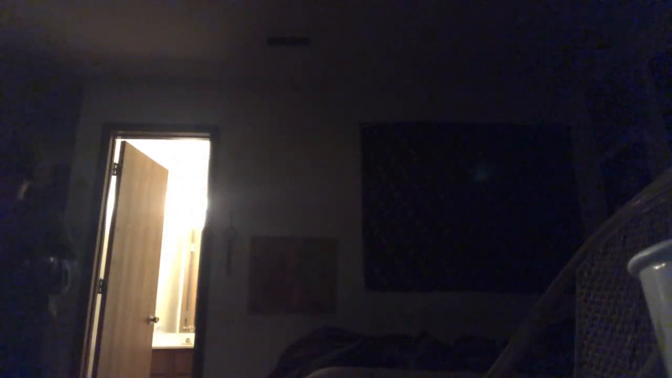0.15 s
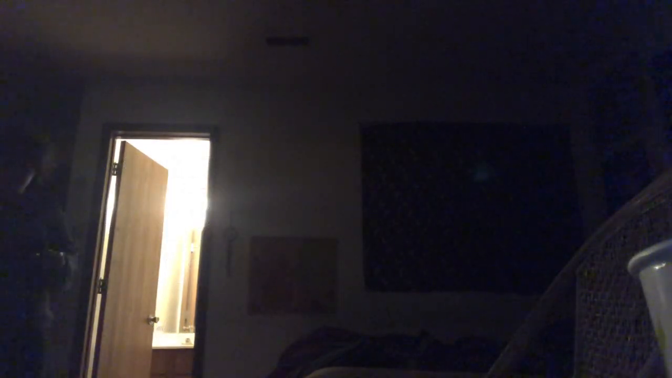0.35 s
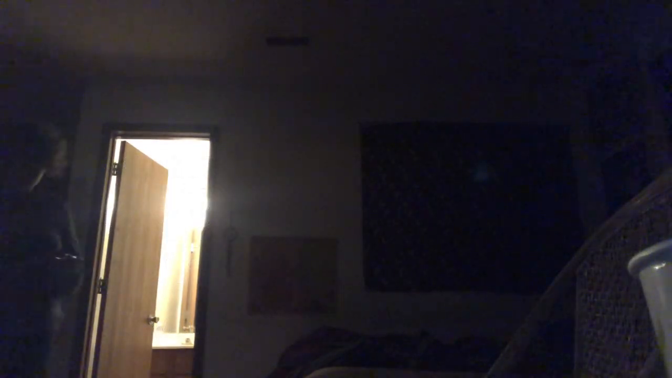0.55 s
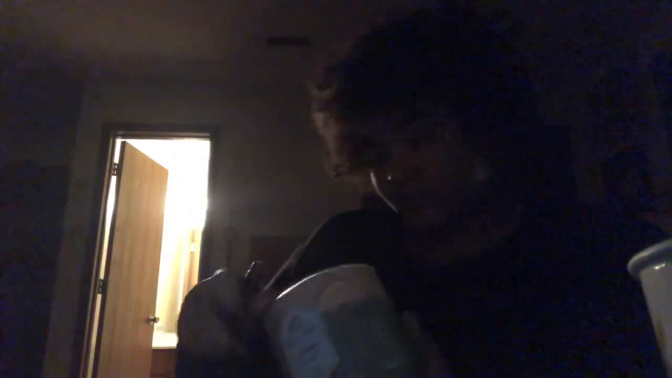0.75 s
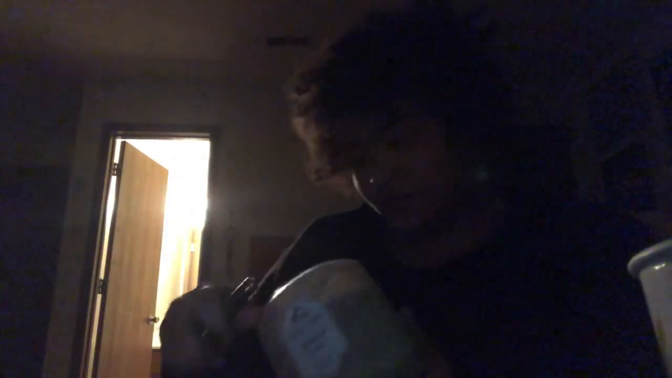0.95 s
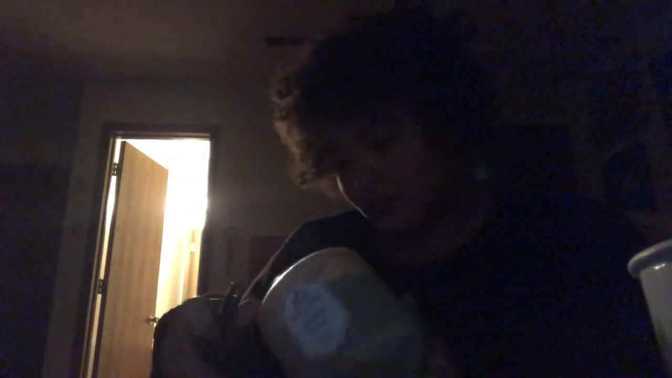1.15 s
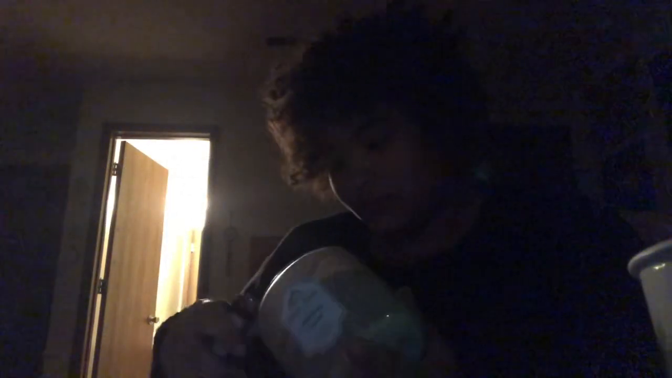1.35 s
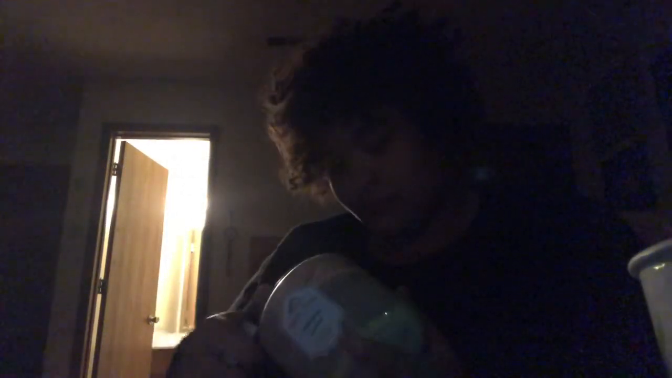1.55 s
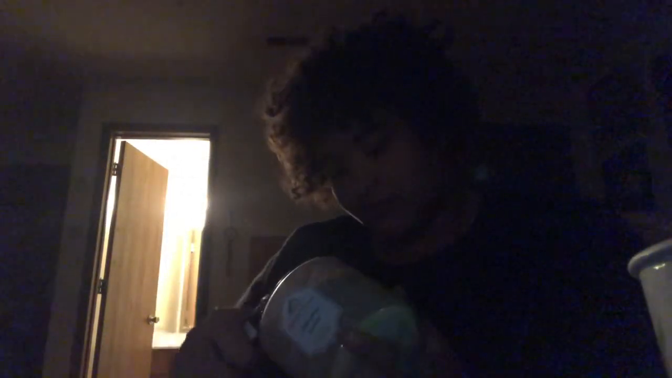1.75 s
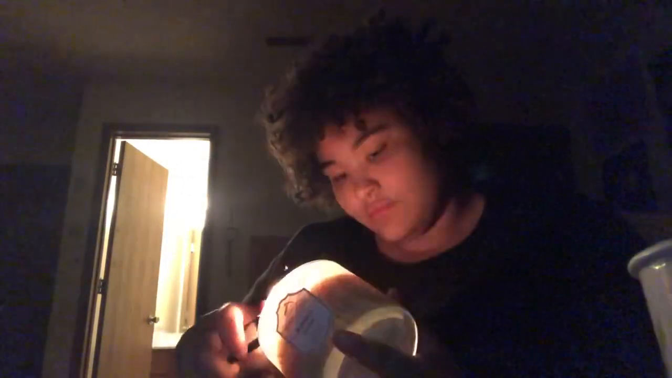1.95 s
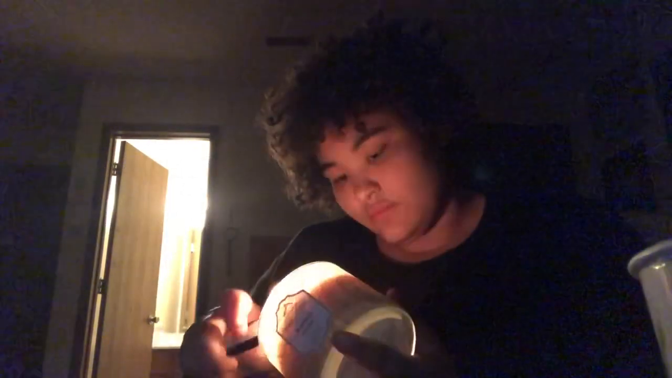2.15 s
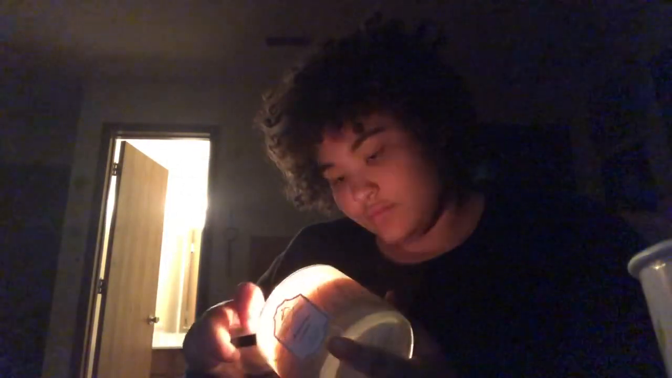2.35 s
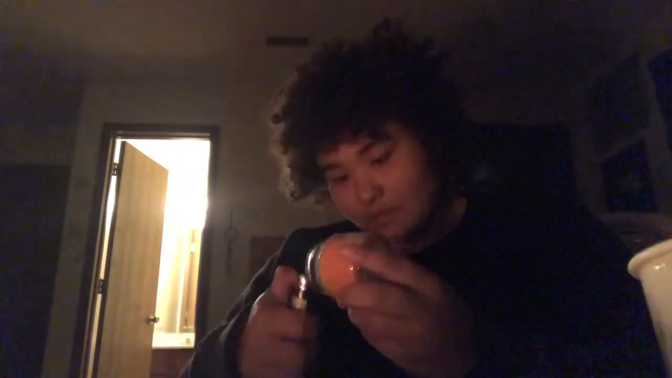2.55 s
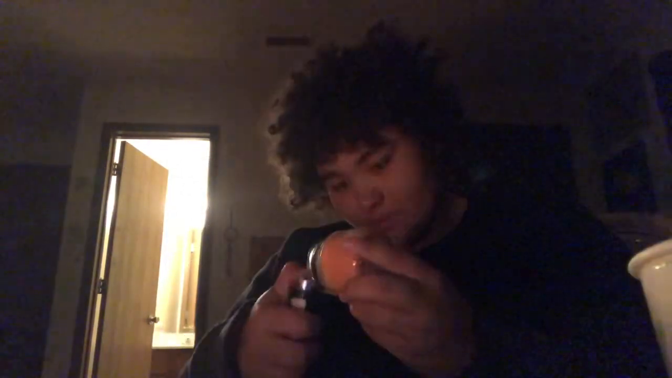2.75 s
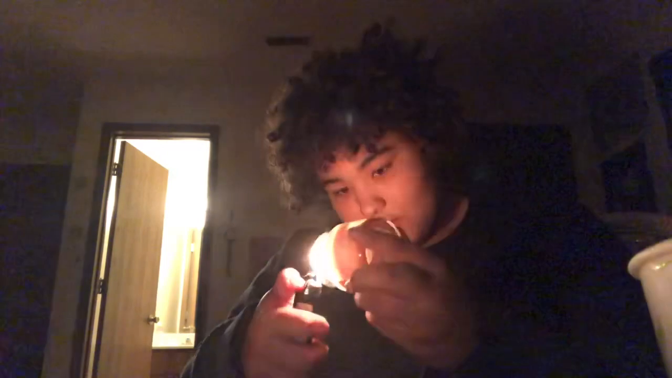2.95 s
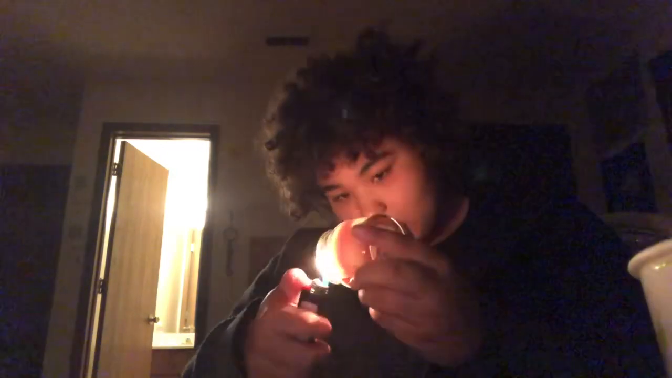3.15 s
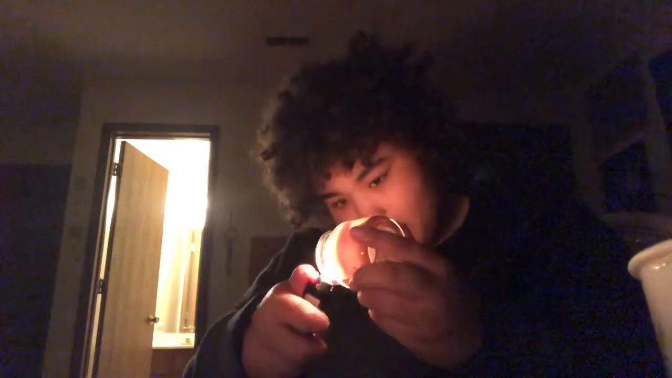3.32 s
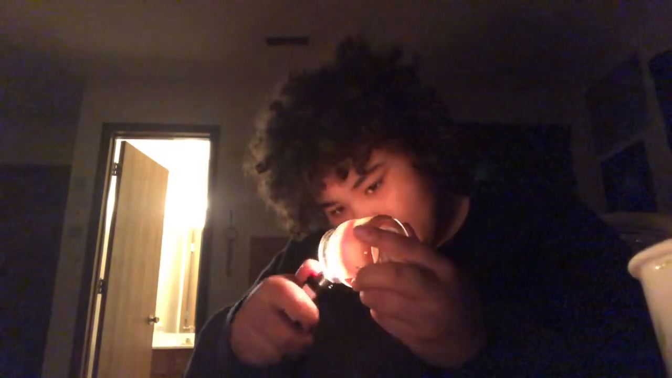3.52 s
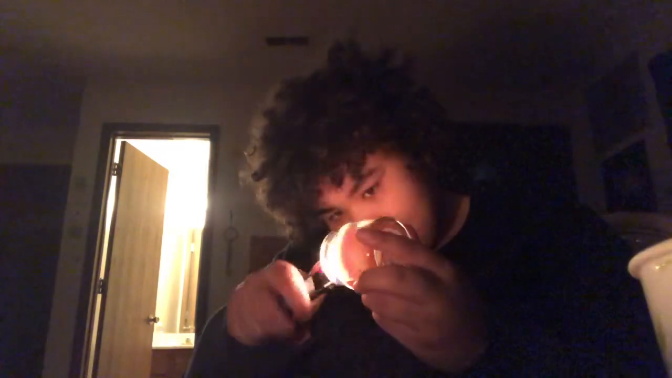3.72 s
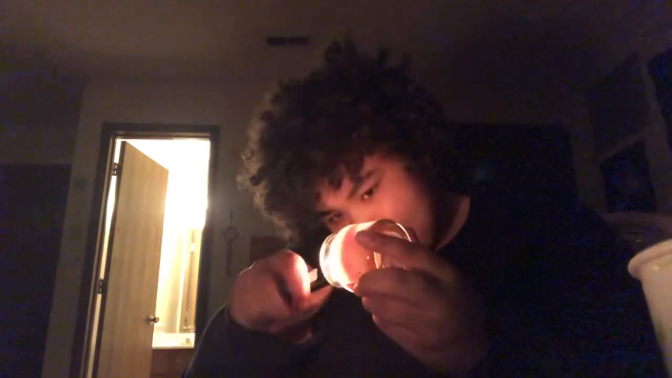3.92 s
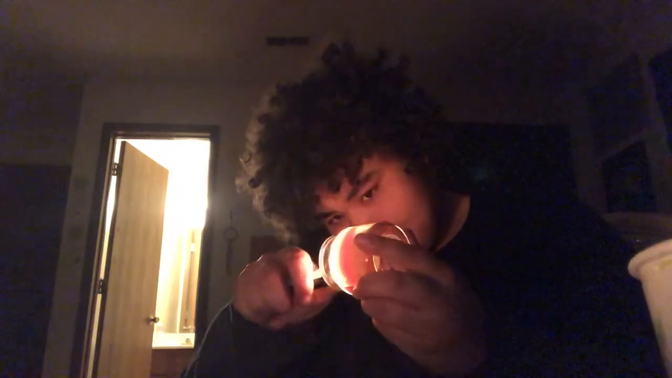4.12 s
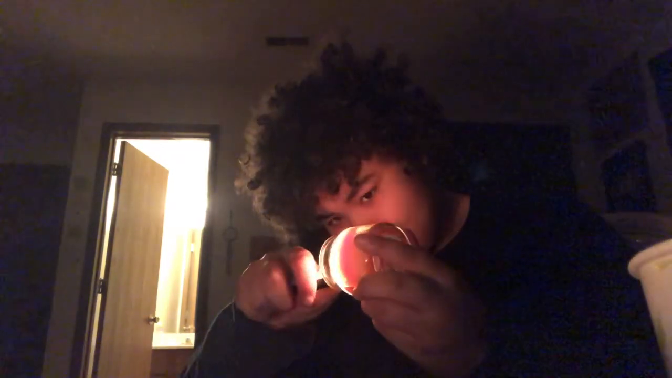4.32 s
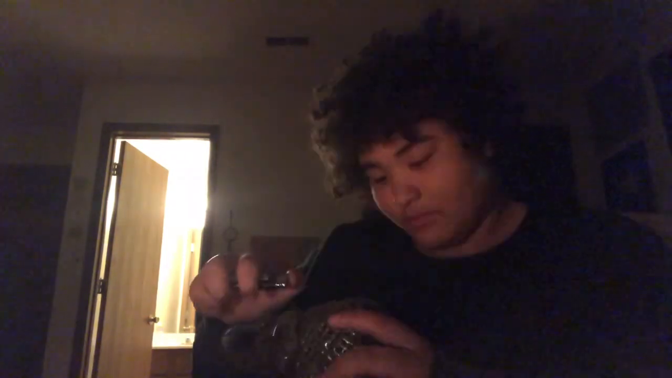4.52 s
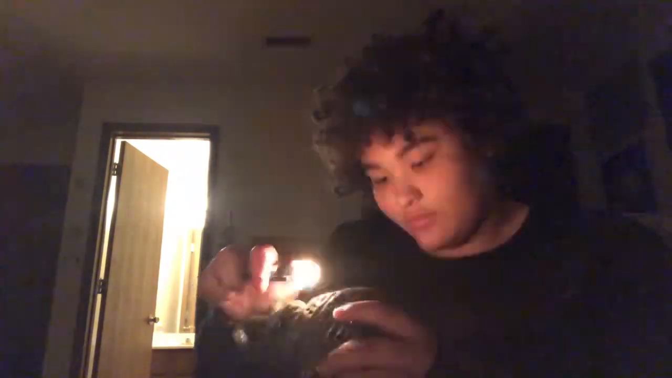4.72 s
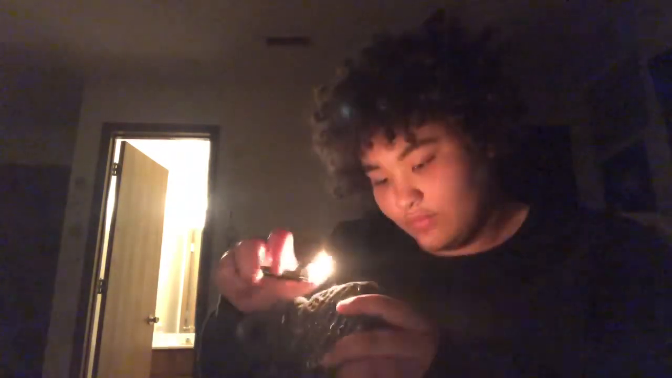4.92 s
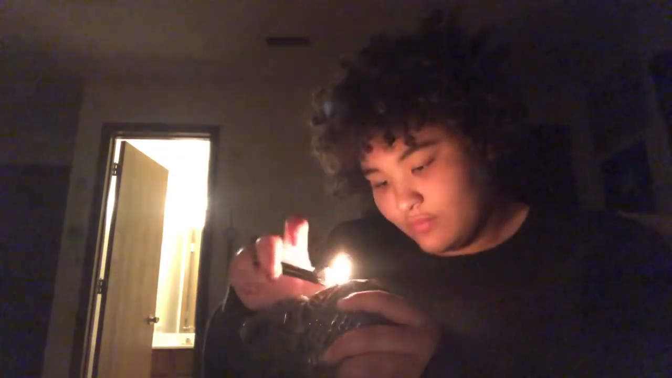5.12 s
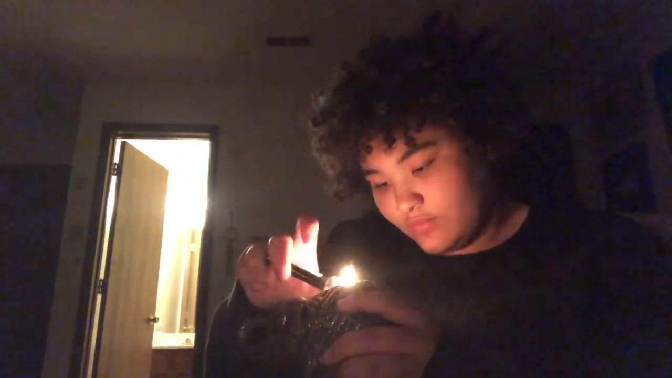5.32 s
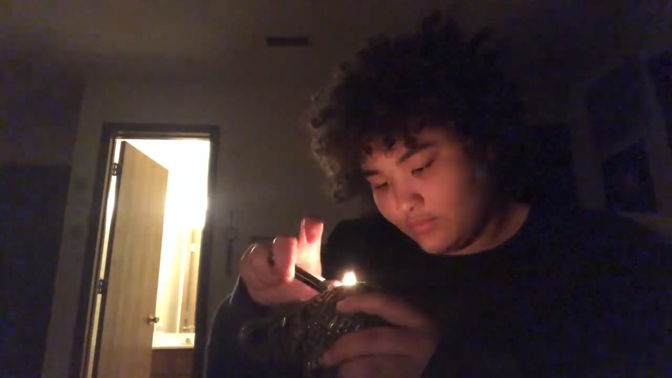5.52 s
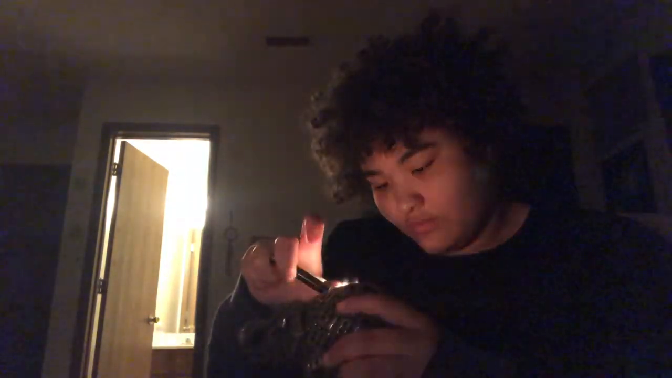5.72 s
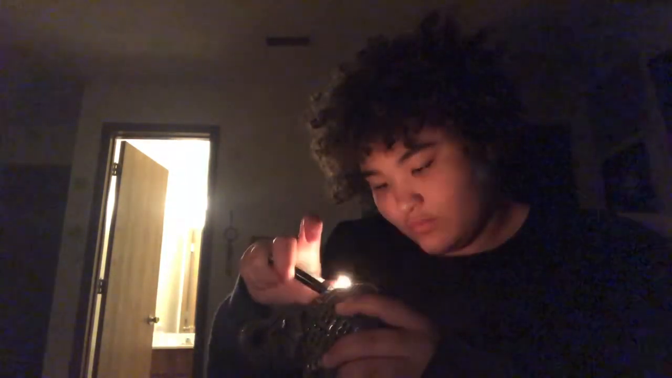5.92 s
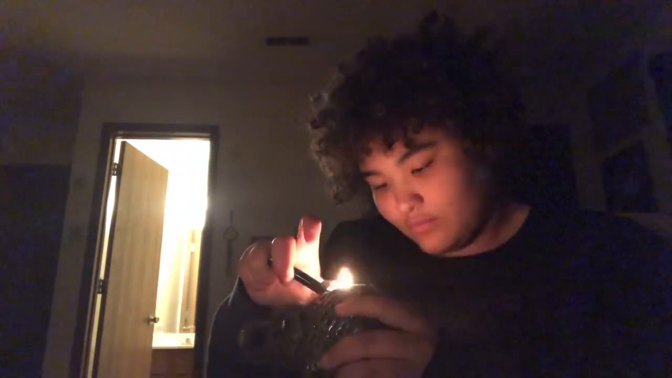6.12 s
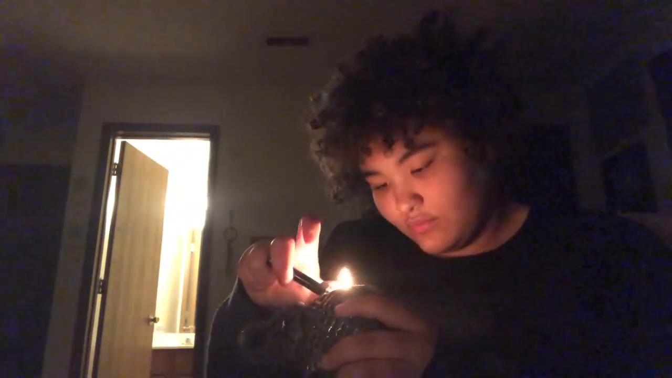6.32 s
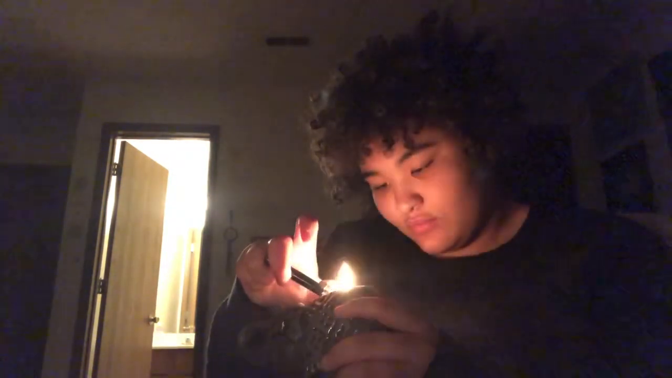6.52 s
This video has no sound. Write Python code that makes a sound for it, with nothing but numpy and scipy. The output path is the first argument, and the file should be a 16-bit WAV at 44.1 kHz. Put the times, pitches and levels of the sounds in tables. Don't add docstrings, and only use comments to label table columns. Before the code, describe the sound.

A quiet, small bedroom heard close up, with low house rumble, a distant airy drone that swells and sinks, and faint microphone hiss. From 0 to 0.7 s clothing swishes, rubs and creaks dully, strongest near 0.3 and 0.6. A brief dip at 0.8 joins another take; weak fabric sounds follow at 1.2-1.7, with a tiny tick at 1.75. At 1.87 a flint wheel rasps upward into a loud, bright snap at 1.92, with a soft thumb thump, short room tail and gas rush. At 2.25 a quick triple tap rings a glass jar, choked at 2.34. After a dip at 2.6, small ticks lead to a shorter strike at 2.95. Lever clicks come near 3.4. After another dip at 4.5, the loudest grind and snap land at 4.69, then ticks at 4.87 and 5.38. Only hiss and gently swelling rumble remain until about 6.7.

```python
import sys
import numpy as np
from scipy import signal
from scipy.fft import rfft, irfft
from scipy.io import wavfile

SR = 44100
rng = np.random.default_rng(int(sys.argv[2]) if len(sys.argv) > 2 else 0)


def linear_from_db(decibels):
    return 10 ** (np.asarray(decibels, float) / 20)


def master(y):
    cut = np.clip(np.atleast_2d(y).T, -1, 1)
    pcm = np.round(cut * 32767)
    wavfile.write(sys.argv[1], SR, pcm.astype(np.int16))


N = 294147
TIME = np.arange(N) / SR

# (start [s], hiss top tilt [dB], hiss level [dB], hiss drift [dB/s], rumble level [dB])
TAKES = [
    (0, -4, -79, -0.5, -75),
    (0.804, -1, -76.5, -0.9, -77.5),
    (2.601, -2, -78.5, -0.75, -76),
    (4.505, 0.1, -77.5, 0, -74),
]
# (frequency [Hz], density [dB/Hz])
HOUSE_SPECTRUM = [(15, -46), (25, -15), (81, 2), (108, -5.5), (130, -6), (271, -12), (295, -13),
                  (406, -24.5), (545, -33), (700, -35), (910, -53.5), (1540, -120)]
# (peak [s], level [dB], 20 dB rise [s], 20 dB fall [s])
RUMBLE_SWELLS = [(1.6, -69.5, 2.5, 1.1), (2.1, -73.5, .8, 0.77), (4.85, -72.5, .8, .8),
                 (5.96, -72, 1.7, 1.0), (6.67, -71, 1.0, 1.0)]
# (peak [s], level [dB], 20 dB rise [s], 20 dB fall [s])
DRONE_SWELLS = [(.78, -81, .6, .6), (1.35, -68.5, 2.2, 1), (2.13, -68.5, 0.94, 1.34),
                (3.699, -66.5, 0.55, 0.86), (4.801, -70.5, 1.42, .8)]
# (frequency [Hz], density [dB/Hz])
HISS_SPECTRUM = [(350, -28.5), (600, 1.5), (975, -1.5), (1250, -1), (1340, -3), (2060, -8), (2340, -8),
                 (4240, -12.5), (5010, -5.5), (6340, -14.5), (15200, -17.5), (15800, -13), (16500, -34)]
# (peak [s], level [dB], 20 dB rise [s], 20 dB fall [s], bright top over body [dB])
CLOTH_STROKES = [
    (.02, -70.5, 0.12, 0.2, -3),
    (.272, -61, 0.15, 0.14, -5.5),
    (.35, -76, 0.089, 0.13, 8),
    (.59, -69, .04, 0.098, -24),
    (.67, -73, 0.065, .3, -8),
    (1.38, -77, .1, 0.19, 5),
    (1.59, -81, 0.098, .06, 13),
    (1.7, -92, .1, .1, -3),
]
# (peak [s], level [dB], 20 dB rise [s], 20 dB fall [s], pitch [Hz])
CLOTH_CREAKS = [
    (.03, -68.5, 0.18, .35, 1400),
    (.22, -70, 0.036, .2, 1400),
    (.28, -63, 0.052, .06, 290),
    (.58, -60, 0.026, 0.17, 1330),
    (.59, -63, 0.061, .05, 265),
    (.685, -63, .05, .06, 273),
    (1.22, -72.5, 0.084, .3, 1300),
    (2.692, -67.5, 0.046, .03, 3400),
    (4.31, -78, .06, .6, 1950),
    (4.45, -82, 0.19, .15, 1952),
]
# (time [s], peak level [dB], part, crack over ring [dB], crack centre [Hz])
TICKS = [(1.75, -57, "guard", -1, 7000), (2.659, -55, "guard", 10.5, 6400),
         (2.6598, -49.5, "hood", 0, 11000), (2.8927, -49, "tank", 9, 4080), (2.8905, -57, "hood", -2, 8000),
         (3.378, -41, "lever", 8.5, 5800), (3.378, -59, "spring", 14, 14500), (3.38, -54, "case", 1, 7000),
         (3.472, -60, "lever", 0, 7000), (3.4745, -58, "lever", -9, 14000), (3.477, -54, "case", 2, 5050),
         (4.653, -55, "case", 3.5, 5020), (4.873, -61, "hood", -1.5, 10000),
         (4.879, -58, "guard", 7.5, 3610), (5.3737, -54, "spring", -4.5, 3400),
         (5.3738, -57.5, "nozzle", 5, 6000), (5.3825, -56, "spring", -2, 3400),
         (5.392, -57, "spring", -6, 3430)]
LIGHTER_PARTS = {"lever": (4550, 130), "guard": (4500, 500), "spring": (2300, 110), "case": (3200, 600),
                 "tank": (1350, 350), "hood": (13000, 3000), "nozzle": (3370, 200)}
# (wheel starts [s], snap [s], grind at start [dB], grind at end [dB], snap level [dB])
STRIKES = [
    (1.874, 1.9217, -68, -34, -18),
    (2.924, 2.9514, -60, -39.5, -17.5),
    (4.653, 4.689, -68, -30, -16),
]
# (frequency [Hz], width [Hz], level in strikes 1, 2, 3 [dB])
WHEEL_MODES = [(4600, 1100, -3.5, 3, -2.5), (11730, 954, 2.5, -12, 3), (8000, 4470, -6, -8, -8),
               (13520, 2800, -10.5, -5.5, -6)]
# (frequency [Hz], width [Hz], level in strikes 1, 2, 3 as grip changes [dB])
SNAP_MODES = [(1300, 60, -16.5, -15.5, -25), (2500, 340, -12.5, -13, -25), (3717, 1200, -2.5, -2, -7),
              (4650, 630, 1, 5.5, -0.5), (5900, 700, -2.5, -4, 2), (7150, 600, -3.5, -3.5, 3),
              (8640, 900, -8.5, -6, 4.5), (10300, 460, -8, 3.5, 1.5), (10940, 800, 4, 4.5, 0),
              (13140, 710, -1.5, 0.5, -5.5), (14570, 1000, 0, -2.5, -3), (16500, 990, -6, -11.5, -12.5)]
# (frequency [Hz], width [Hz], level [dB])
GRIP_MODES = [(100, 32, -0.5), (194, 110, -1), (329.2, 77, 3.5), (578, 210, 2), (1050, 340, 1)]
# (frequency [Hz], density [dB/Hz])
SNAP_SPREAD = [
    [(88, -37.5), (150, -11.5), (354, -1), (612, -15.5), (1420, -13.5), (1560, -25.5), (2450, -14),
     (5250, -8.5), (8900, -11.5), (14200, -4.5), (16000, -18.5)],
    [(88, -43.5), (150, -17), (315, -8.5), (759, -25.5), (923, -25.5), (1260, -16), (2920, -17),
     (4410, -1.5), (6390, -11.5), (8730, -5.5), (16000, -18.5)],
    [(88, -30), (150, -2.5), (406, -13), (888, -20), (1450, -14.5), (1900, -20.5), (3290, -14), (3620, -16),
     (4490, -7.5), (14800, -10), (16000, -16.5)],
]
# (time [s], level [dB])
JAR_TAPS = [
    (2.2475, -39),
    (2.2497, -36.5),
    (2.2565, -44),
]
# (frequency [Hz], level [dB], t60 [s])
JAR_MODES = [(910, -25, 0.018), (1003, -2.5, 0.051), (1015, -8.5, 0.07), (1134, -11, 0.23),
             (1247, -10, 0.11), (1324, 1.5, 0.02), (1993, -14.5, 0.38), (2013, -9, 0.17), (3430, -25, 0.27),
             (3280, -14, 0.053), (5040, -22.5, 0.2), (5090, -29, 0.23), (8000, -13, 0.015),
             (13000, -13, 0.011)]
# (frequency [Hz], t60 [s])
ROOM_T60 = [(150, .25), (500, 0.31), (1500, 0.27), (3200, 0.3), (5200, 0.27), (8000, 0.21), (11000, 0.18),
            (15000, 0.11)]
# (delay [s], level [dB])
NEAR_ECHOES = [(.0045, -24), (.0085, -20.5), (.014, -24), (.021, -23)]


def rms_one(x):
    return x / np.sqrt(np.mean(x ** 2) + 1e-20)


def at_hz(points, hz):
    table = np.array(points)
    return np.interp(np.log(hz), np.log(table[:, 0]), table[:, 1])


def band(x, low_hz, high_hz):
    edges = [low_hz, min(high_hz, .47 * SR)]
    return signal.sosfilt(signal.butter(2, edges, "band", fs=SR, output="sos"), x)


def peak(x, hz, width_hz):
    r = np.exp(-np.pi * width_hz / SR)
    feedback = [1, -2 * r * np.cos(2 * np.pi * hz / SR), r * r]
    return signal.lfilter(np.array([1, 0, -1]) * (1 - r * r) / 2, feedback, x)


def drift(rate_hz):
    knots = rng.standard_normal(400)
    return np.interp(TIME * rate_hz, np.arange(len(knots)), knots)


def coloured(spectrum, patchy_db):
    hz = np.maximum(np.fft.rfftfreq(N, 1 / SR), 1)
    noise = irfft(rfft(rng.standard_normal(N)) * linear_from_db(at_hz(spectrum, hz)), N)
    return rms_one(noise) * linear_from_db(patchy_db * drift(8))


def gritty(length, rough_db):
    return rng.standard_normal(length) * linear_from_db(rough_db * rng.standard_normal(length))


def swell(s, db, rise_s, fall_s):
    rising = (s - TIME) / max(rise_s, .01)
    falling = (TIME - s) / max(fall_s, .01)
    return linear_from_db(db - 20 * np.maximum(rising, falling))


def swelling_level(rest_db, swells):
    return np.sqrt(linear_from_db(rest_db) ** 2 + sum(swell(*row) ** 2 for row in swells))


def add(out, sound, s):
    i = round(s * SR)
    out[i:i + len(sound)] += sound[:N - i]


def take_settings():
    takes = np.array(TAKES)
    return takes[np.searchsorted(takes[:, 0], TIME, "right") - 1].T


def house_rumble():
    rest_db = take_settings()[4]
    return linear_from_db(5.0) * swelling_level(rest_db, RUMBLE_SWELLS) * coloured(HOUSE_SPECTRUM, patchy_db=1.5)


def far_drone():
    rest_db, opening = -73.5, .5
    air = rng.standard_normal(N)
    level = swelling_level(rest_db, DRONE_SWELLS)
    upper = linear_from_db(-6) * (level / linear_from_db(rest_db)) ** opening * peak(air, 530, 110)
    lower = linear_from_db(-8.5) * peak(air, 260, 90)
    return level * rms_one(peak(air, 338, 70) - upper + lower)


def microphone_hiss():
    start, tilt_db, hiss_db, drift_db, _ = take_settings()
    hiss = coloured(HISS_SPECTRUM, patchy_db=.1)
    hiss = signal.sosfilt(signal.cheby2(12, 40, 16150, fs=SR, output="sos"), hiss)
    top = band(hiss, 7000, 18000)
    level_db = hiss_db + drift_db * (TIME - start) + 7.5
    return linear_from_db(level_db) * (hiss + (linear_from_db(tilt_db) - 1) * top)


def cloth():
    body = rms_one(band(gritty(N, 1.2), 1070, 4800))
    top = rms_one(band(gritty(N, 1.2), 4100, 15000))
    seam = gritty(N, 1.2)
    out = np.zeros(N)
    for *shape, top_db in CLOTH_STROKES:
        out += swell(*shape) * (body + linear_from_db(top_db - 4) * top)
    for *shape, hz in CLOTH_CREAKS:
        out += swell(*shape) * rms_one(peak(seam, hz, .36 * hz))
    return out


def finger_ticks():
    out, t = np.zeros(N), np.arange(SR // 10) / SR
    for s, db, part, crack_db, crack_hz in TICKS:
        crack = rng.standard_normal(len(t)) * np.exp(-t / .0007)
        for _ in range(2):
            crack = peak(crack, crack_hz, 0.73 * crack_hz)
        ring = peak(1. * (t == 0), *LIGHTER_PARTS[part])
        ring /= np.abs(ring).max()
        crack /= np.abs(crack).max()
        add(out, linear_from_db(db) * (ring + linear_from_db(crack_db - 3) * crack), s)
    return out


def wheel_grind(k, t, after):
    start, snap, soft_db, hard_db, _ = STRIKES[k]
    grit = gritty(len(t), 1.5)
    share = np.clip(t / (snap - start), 0, 1)
    grind = np.zeros(len(t))
    for hz, width_hz, *mode_db in WHEEL_MODES:
        rise = share ** (1.8 + .09 * hz / 1000)
        level_db = mode_db[k] + soft_db - 2.0 + (hard_db - soft_db) * rise
        grind += linear_from_db(level_db) * rms_one(peak(grit, hz, width_hz))
    grind *= np.exp(-after / .003) * np.clip(t / 0.0064, 0, 1)
    teeth = np.sin(2 * np.pi * 130 * t * (1 + 0.99 * share))
    return grind * linear_from_db(1.6 * teeth)


def snap_crack(k, after):
    burst = np.exp(-(after / 0.003) ** 4.4) + linear_from_db(-19) * np.exp(-after / 0.0026)
    burst *= np.clip(after / 0.0012, 0, 1) * np.sign(rng.standard_normal(len(after)))
    crack = np.zeros(len(after))
    for j, (hz, width_hz, *mode_db) in enumerate(SNAP_MODES):
        sign = (-1) ** max(j, 1)
        crack += sign * linear_from_db(mode_db[k]) * rms_one(peak(burst, hz, width_hz))
    return linear_from_db(STRIKES[k][4] - 23) * crack


def thumb_thump(after):
    lag_s, thump_db = 0.00079, -42.5
    push = np.clip(after / lag_s, 0, 1) ** 2 * np.exp(-after / 0.0035) * gritty(len(after), 1.5)
    thump = np.zeros(len(after))
    for j, (hz, width_hz, db) in enumerate(GRIP_MODES):
        thump += (-1) ** j * linear_from_db(db) * rms_one(peak(push, hz, width_hz))
    return linear_from_db(thump_db - 16.5) * thump


def strikes():
    near, spread, t = np.zeros(N), np.zeros(N), np.arange(SR // 8) / SR
    for k, (start, snap, _, _, snap_db) in enumerate(STRIKES):
        after = np.maximum(t - (snap - start), 0)
        grind = wheel_grind(k, t, after)
        add(near, grind + snap_crack(k, after) + thumb_thump(after), start)
        hz = np.fft.rfftfreq(512, 1 / SR) + 1
        pulse = np.fft.fftshift(irfft(linear_from_db(at_hz(SNAP_SPREAD[k], hz))))
        add(spread, linear_from_db(snap_db + 20.5) * pulse, snap - 256 / SR + 0.0016)
        add(spread, linear_from_db(-14) * grind, start)
    return near, spread


def gas():
    out, t = np.zeros(N), np.arange(SR // 2) / SR
    gas_db, dying_s = -52.5, 0.057
    for _, snap, *_ in STRIKES:
        rush = band(rng.standard_normal(len(t)), 6500, 15500) * np.exp(-t / dying_s)
        add(out, linear_from_db(gas_db) * rush, snap)
    return out


def glass_jar():
    out, t = np.zeros(N), np.arange(SR // 3) / SR
    hz, mode_db, t60 = np.array(JAR_MODES).T[:, :, None]
    damped_s = 2.338
    for s, db in JAR_TAPS:
        strength = linear_from_db(mode_db + rng.standard_normal(mode_db.shape))
        rings = strength * np.sin(2 * np.pi * hz * t) * linear_from_db(-60 * t / t60)
        ring = rings.sum(axis=0) * np.clip(t / 0.00083, 0, 1)
        crack = band(rng.standard_normal(len(t)) * np.exp(-t / 0.00056), 2400, 18000)
        crack_db = -5.5 + db - JAR_TAPS[0][1]
        add(out, linear_from_db(db) * (ring + linear_from_db(crack_db) * crack), s)
    return out * np.exp(-np.maximum(TIME - damped_s, 0) / .004)


def bedroom(near, spread):
    room_db, lumps_db, lump_s = -2.0, 1.5, .0025
    t = np.arange(SR // 2) / SR
    edges = 60 * 2 ** np.arange(0, 8.6, .5)
    white = rng.standard_normal((2, len(t)))
    tail = np.zeros(len(t))
    for k, (low, high) in enumerate(zip(edges, edges[1:])):
        t60 = at_hz(ROOM_T60, np.sqrt(low * high))
        tail += band(white[k % 2], low, high) * linear_from_db(-60 * t / t60)
    lumps = np.interp(t / lump_s, np.arange(400), rng.standard_normal(400))
    tail *= np.clip(t / 0.0045, 0, 1) * linear_from_db(lumps_db * lumps)
    tail /= np.sqrt(np.sum(tail ** 2))
    out = near + signal.fftconvolve(spread, linear_from_db(room_db) * tail)[:N]
    for delay_s, db in NEAR_ECHOES:
        add(out, linear_from_db(db) * near, delay_s)
    return out


def scene():
    background = house_rumble() + far_drone() + microphone_hiss()
    fabric = cloth()
    fingers = finger_ticks()
    near, spread = strikes()
    flames = gas()
    glass = glass_jar()
    spread = spread + linear_from_db(-8.5) * fingers + linear_from_db(-10) * glass
    room = bedroom(near + fingers + glass, spread)
    return (room + flames + fabric + background)[None]


def low_pass(x):
    return signal.sosfilt(signal.butter(12, 16820, fs=SR, output="sos"), x)


def record(dry):
    mix = signal.sosfilt(signal.butter(4, 37, "high", fs=SR, output="sos"), dry)
    mix = .44 * np.tanh(mix / .44)
    mix = signal.sosfilt(signal.cheby2(16, 50, 16800, fs=SR, output="sos"), mix)
    fade_s = 0.03
    from_join = np.min([np.abs(TIME - row[0]) for row in TAKES[1:]], axis=0)
    mix = mix * np.clip(from_join / fade_s, .02, 1)
    return low_pass(mix)


dry = scene()
out = record(dry)
master(out)
```